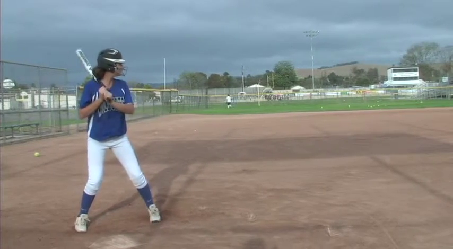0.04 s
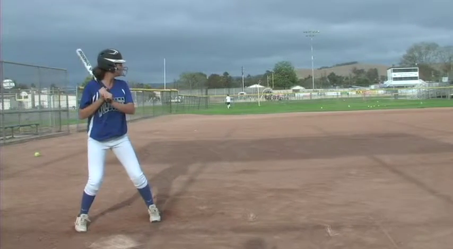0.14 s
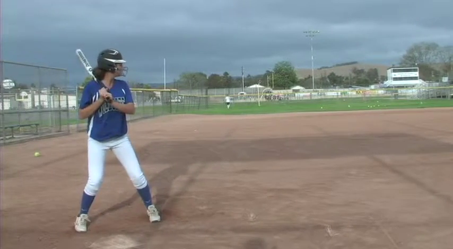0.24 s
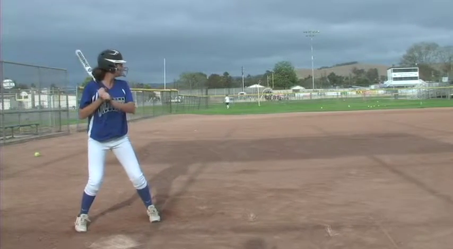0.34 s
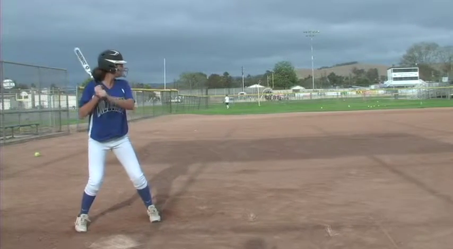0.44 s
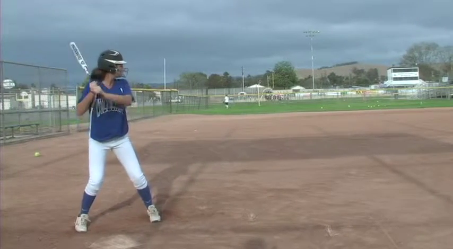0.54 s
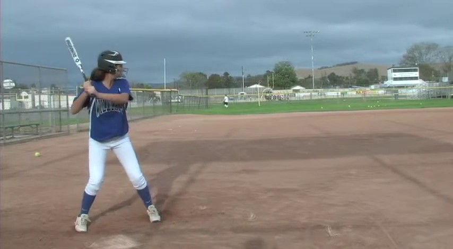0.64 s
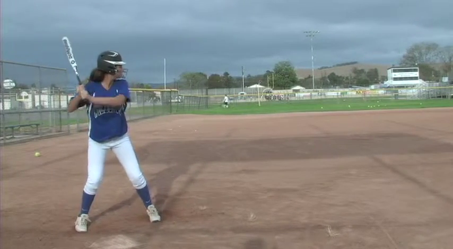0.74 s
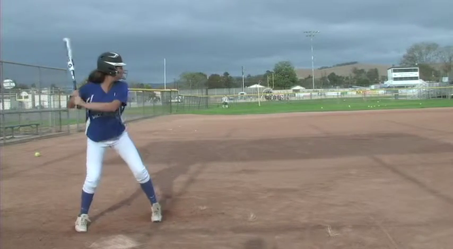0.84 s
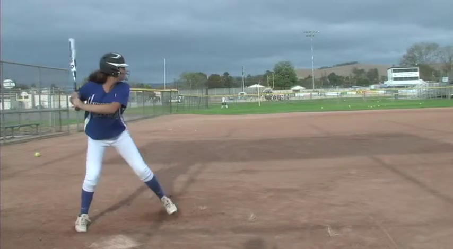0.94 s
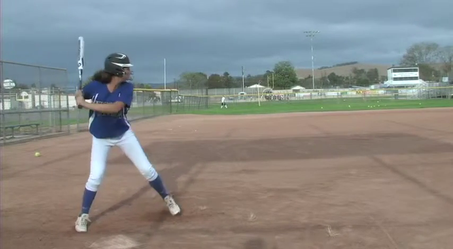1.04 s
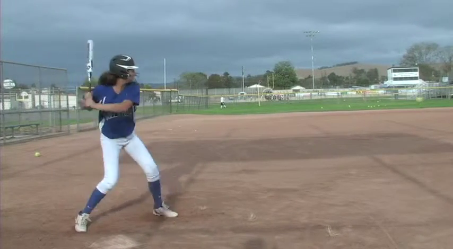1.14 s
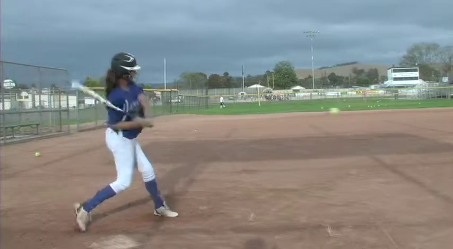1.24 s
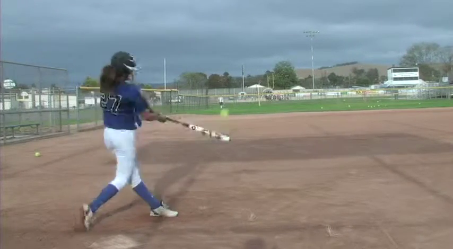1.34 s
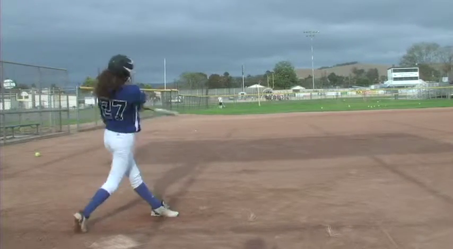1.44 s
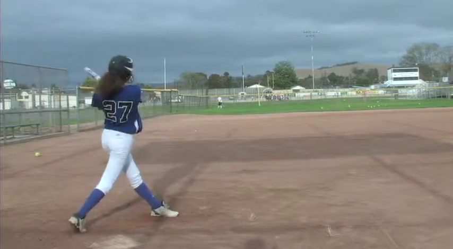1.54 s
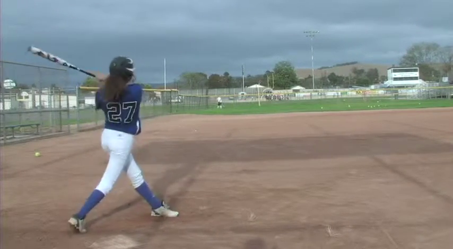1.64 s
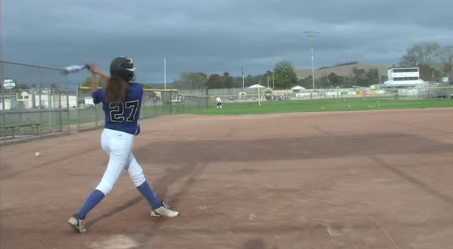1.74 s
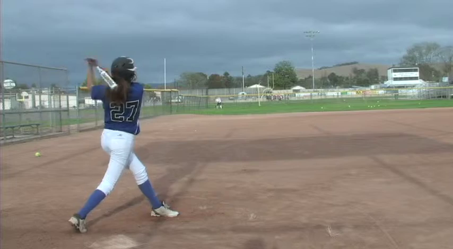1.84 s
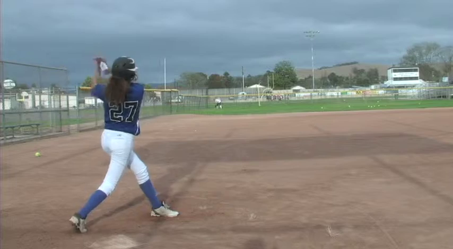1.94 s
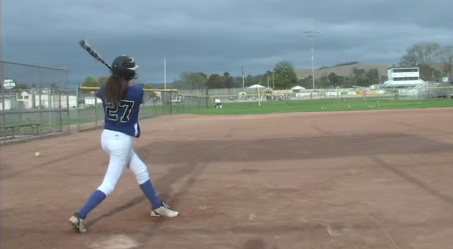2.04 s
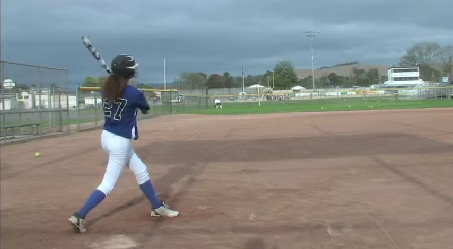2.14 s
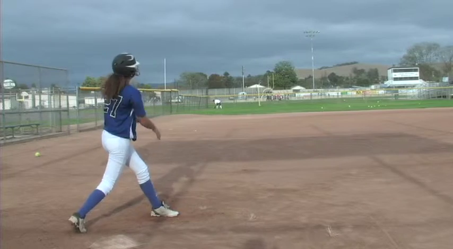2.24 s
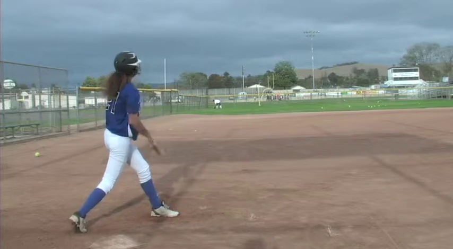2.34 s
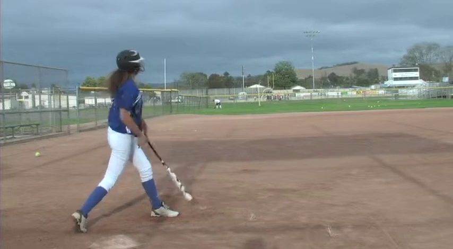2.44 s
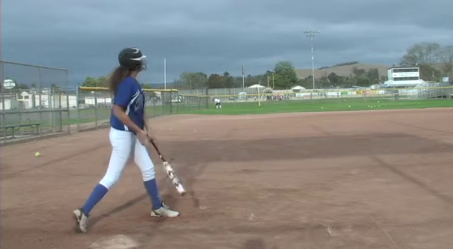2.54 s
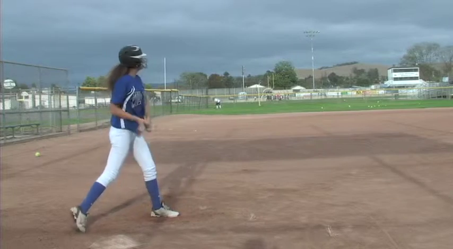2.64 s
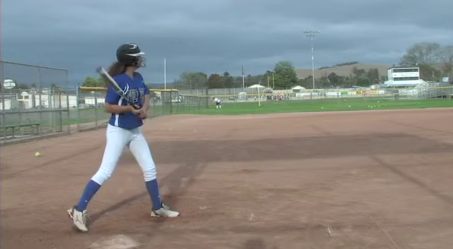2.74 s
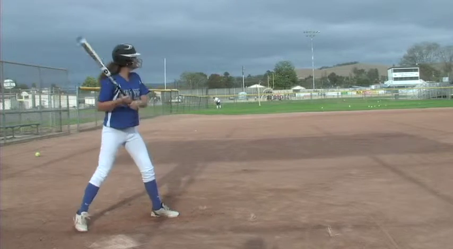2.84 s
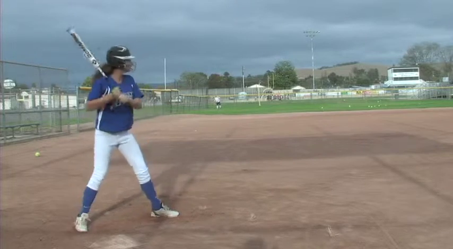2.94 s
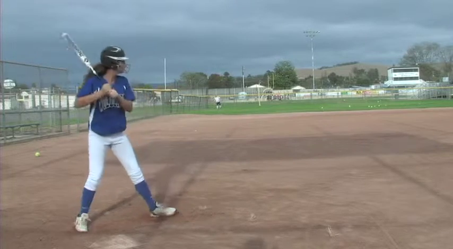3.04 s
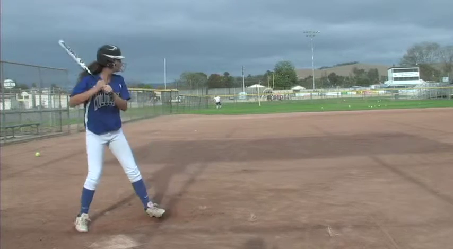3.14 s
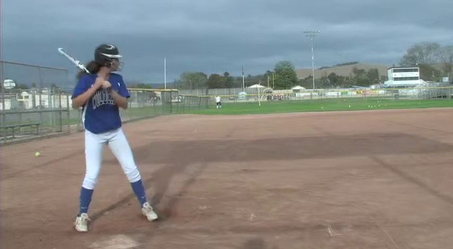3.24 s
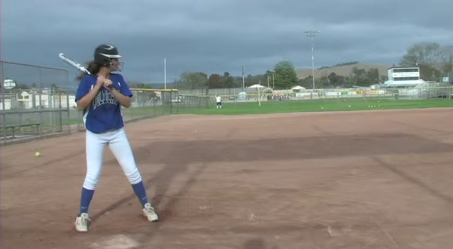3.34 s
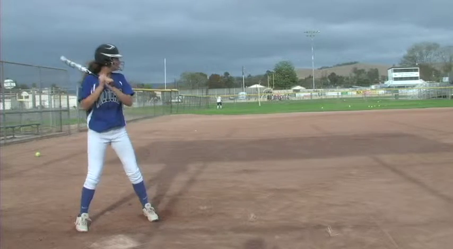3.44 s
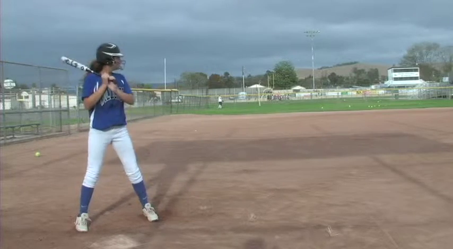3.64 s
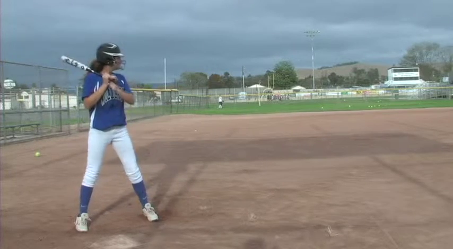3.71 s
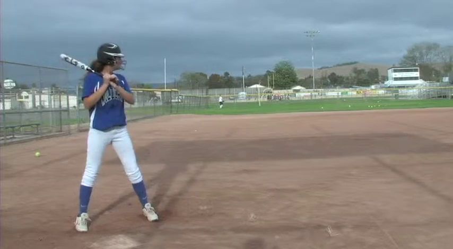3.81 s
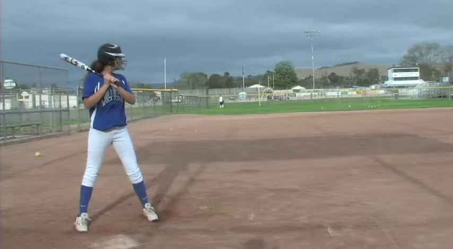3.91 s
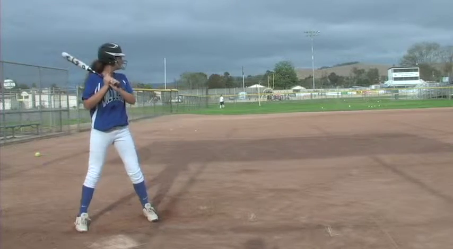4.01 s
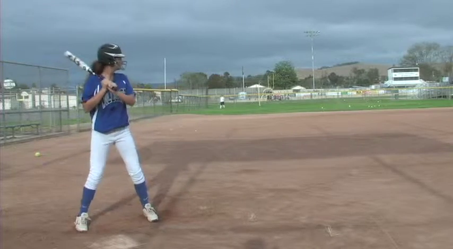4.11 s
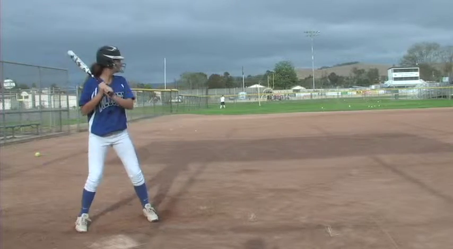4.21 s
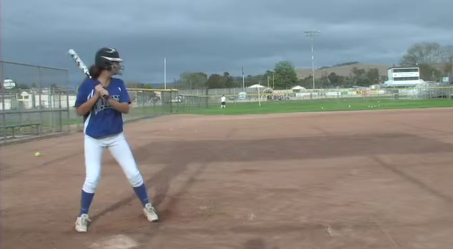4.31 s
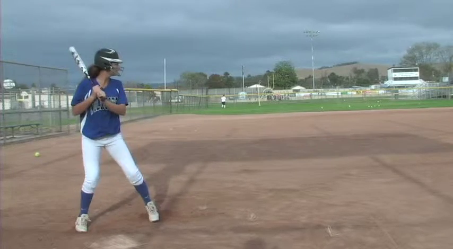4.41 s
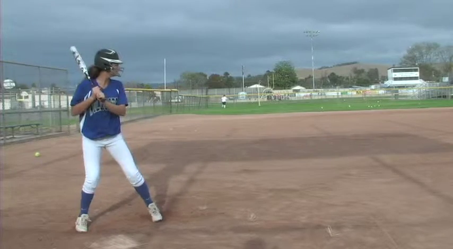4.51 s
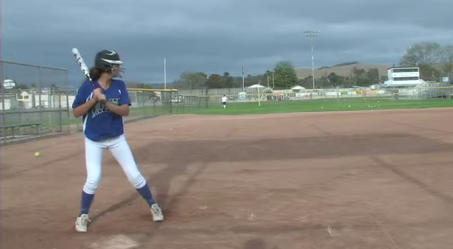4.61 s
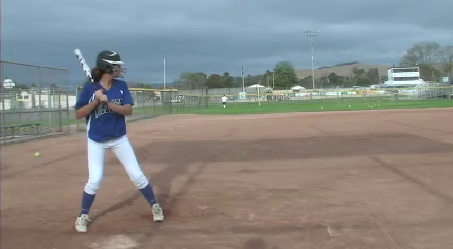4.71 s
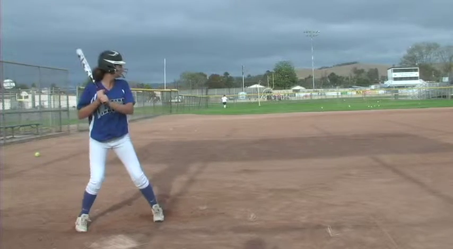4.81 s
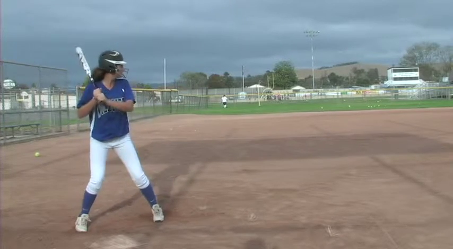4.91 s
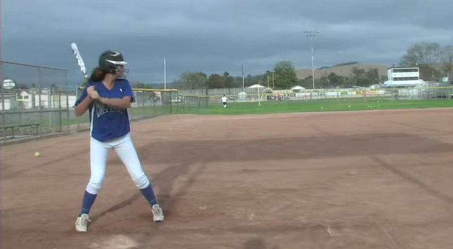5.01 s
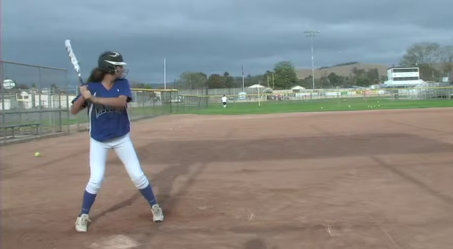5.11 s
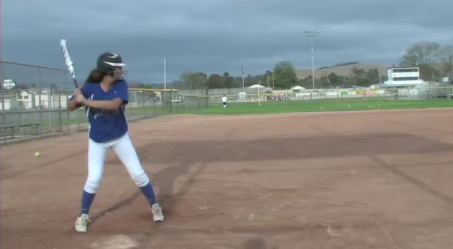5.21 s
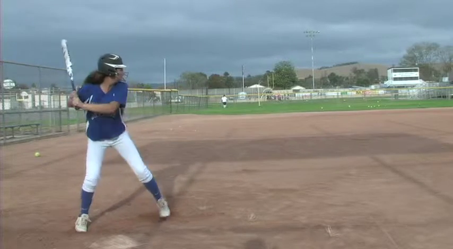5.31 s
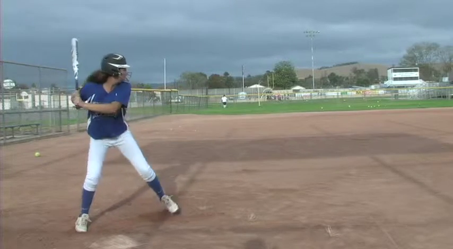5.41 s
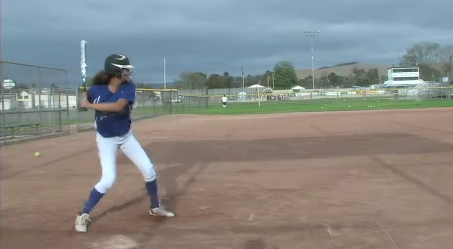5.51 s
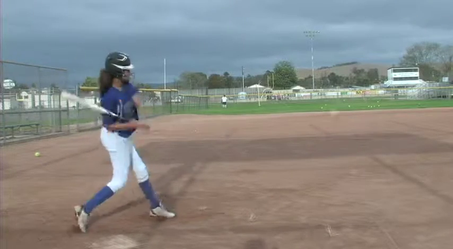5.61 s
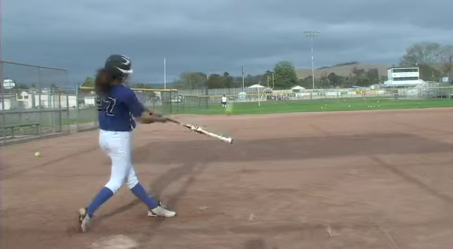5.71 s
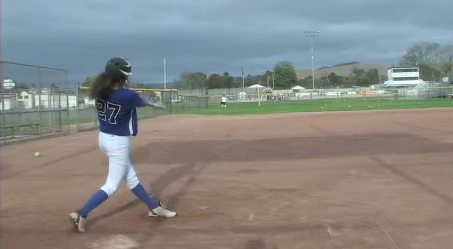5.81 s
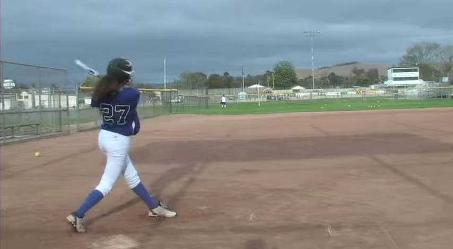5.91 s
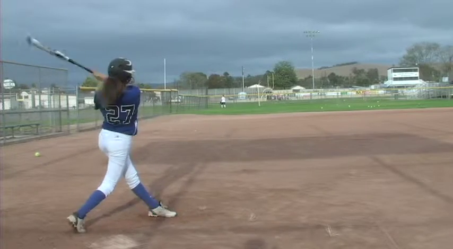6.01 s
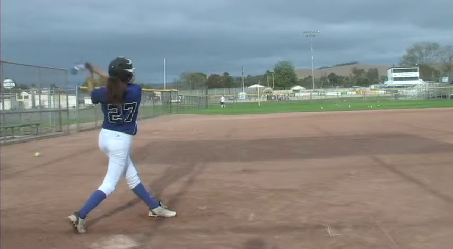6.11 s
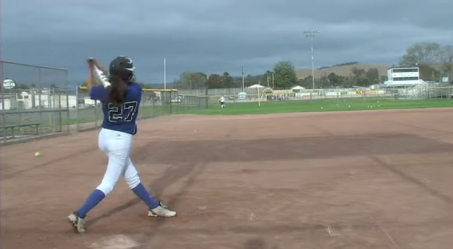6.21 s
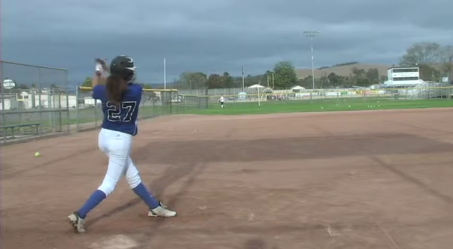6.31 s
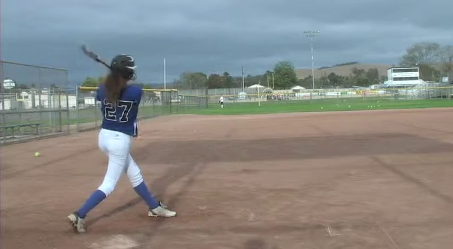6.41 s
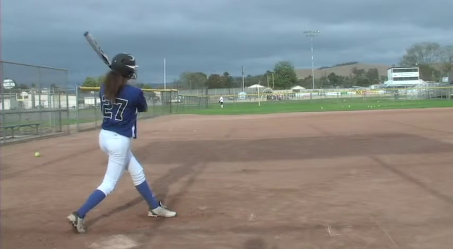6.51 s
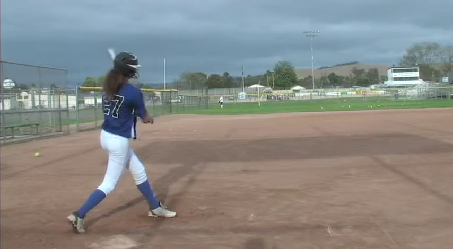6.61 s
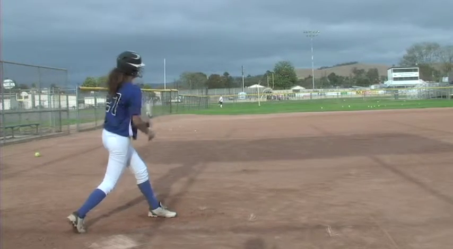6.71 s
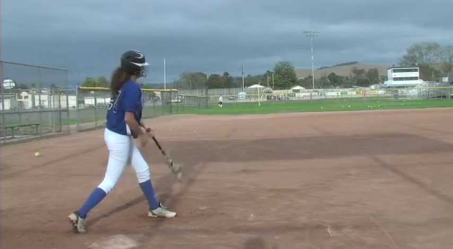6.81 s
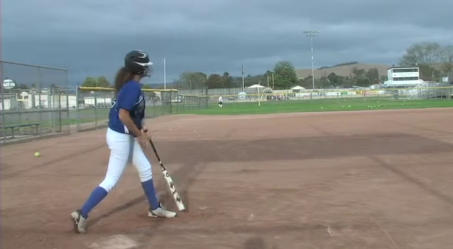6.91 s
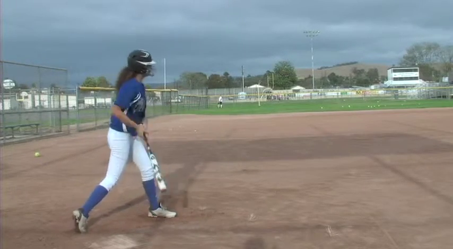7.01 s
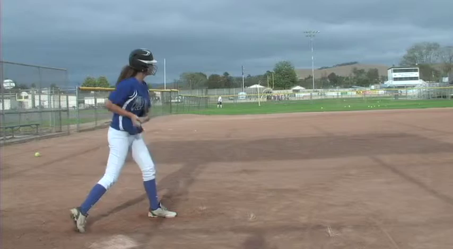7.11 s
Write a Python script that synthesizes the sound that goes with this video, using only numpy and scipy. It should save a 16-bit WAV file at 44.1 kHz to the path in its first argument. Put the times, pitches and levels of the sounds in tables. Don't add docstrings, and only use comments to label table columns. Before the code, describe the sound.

Close outdoor sound of batting practice: a scraping thump as a machine throws the ball, a brief airy swish, then a sharp, hollow, clipped crack with scattered short echoes. It happens twice, about four seconds apart. Between them a fast puttering motor, low traffic roar, hissing foliage and faint far-off knocks continue, with a little low wind flutter at the very end.

```python
import sys
import numpy as np
from scipy import signal
from scipy.fft import rfft, irfft, next_fast_len
from scipy.io import wavfile
from scipy.ndimage import uniform_filter1d, map_coordinates

SR = 44100
rng = np.random.default_rng(int(sys.argv[2]) if len(sys.argv) > 2 else 0)


def log_audio(samples):
    frames = np.atleast_2d(samples).T
    limited = np.clip(frames, -1, 1)
    pcm = np.round(limited * 32767).astype(np.int16)
    wavfile.write(sys.argv[1], SR, pcm)


def volts_from_decibels(level):
    exponent = np.asarray(level, float) / 20
    return 10 ** exponent


N = 315315

# contact in seconds, crack in dB, body in dB.
HITS = [
    (1.3749, 2.5, 9),
    (5.7422, 2.5, 8.5),
]
# time in seconds, level of the leaves in dB.
GUSTS = [(0.0, -52), (0.88, -52.5), (1.04, -50), (1.37, -49.5), (2.41, -52.5), (2.95, -49.5), (3.27, -52.5),
         (3.68, -49), (3.98, -54.5), (5.16, -50.5), (6.21, -51), (6.35, -49.5), (6.91, -51), (7.15, -48.5)]


def unit(x):
    return x / np.sqrt(np.mean(x ** 2) + 1e-20)


def along(points, hz):
    f, v = np.transpose(points)
    return np.interp(np.log(hz + 1), np.log(f + 1), v)


def curves(rows):
    s, *cols = np.transpose(rows)
    return [np.interp(np.arange(N) / SR, s, c) for c in cols]


def wobble(rate):
    coarse = np.arange(0, N + 64, 64)
    knots = rng.standard_normal(int(N * rate / SR) + 4)
    return np.interp(np.arange(N), coarse, map_coordinates(knots, [coarse * rate / SR]))


def swell(s, db, rise_db_per_s, fall_db_per_s):
    late = np.arange(N) / SR - s
    return volts_from_decibels(db + np.where(late < 0, rise_db_per_s, -fall_db_per_s) * late)


def filtered(x, response):
    m = next_fast_len(N + SR // 2)
    return irfft(rfft(x, m) * response(np.fft.rfftfreq(m, 1 / SR)), m)[..., :N]


def noise(spectrum, patchy_db):
    z = signal.stft(rng.standard_normal(N), nperseg=512)[2]
    field = uniform_filter1d(rng.standard_normal(z.shape), size=6, axis=0)
    field = uniform_filter1d(field, size=14, axis=1)
    x = signal.istft(z * volts_from_decibels(patchy_db * unit(field)), nperseg=512)[1][:N]
    return unit(filtered(x, lambda hz: volts_from_decibels(along(spectrum, hz))))


def ring(modes, attack):
    t = np.arange(SR // 2) / SR
    tones = sum(volts_from_decibels(db - 60 * t / t60) * np.sin(2 * np.pi * hz * t) for hz, db, t60 in modes)
    return (1 - np.exp(-t / attack)) ** 2 * tones


def squash(hz, lag, contact):
    t = np.arange(SR // 2) / SR - lag
    onset = np.minimum((t + lag) / .0004, 1)
    return onset * np.sin(2 * np.pi * hz * t) * np.sin(np.pi * np.clip(t / contact, 0, 1)) ** 2


def blows(events, echoes, burst, colour, bodies, wet_db):
    # frequency in Hz, t60 in seconds.
    field_decay = [(150, 0.29), (600, 0.28), (2500, 0.45), (6000, 0.35), (14000, 0.39)]
    clock = np.arange(N) / SR
    envelope = np.zeros((2, N))
    strikes = np.zeros((2, N))
    for s, burst_db, body_db in events:
        for late, echo_burst_db, echo_body_db in echoes:
            arrival = s + late
            near = slice(round((arrival - .02) * SR), round((arrival + .05) * SR))
            bright = np.exp(-late / .05)
            pulse = volts_from_decibels(burst_db + echo_burst_db) * burst(clock[near] - s - late)
            envelope[:, near] += pulse * [[bright], [1 - bright]]
            strikes[int(late > 0), round(arrival * SR)] += volts_from_decibels(body_db + echo_body_db)

    hiss = noise(colour, patchy_db=-1)
    dull = unit(filtered(hiss, lambda hz: 1 / (1 + (4000 / (hz + 1)) ** 2) / (1 + (hz / 6800) ** 4)))
    ringing = signal.fftconvolve(strikes, bodies, axes=1)[:, :N].sum(axis=0)
    close = envelope[0] * hiss + envelope[1] * dull + ringing

    hz, t, z = signal.stft(rng.standard_normal(SR // 2), SR, nperseg=256)
    tail = signal.istft(z * volts_from_decibels(-60 * t / along(field_decay, hz)[:, None]), SR, nperseg=256)[1]
    return close + volts_from_decibels(wet_db) * signal.fftconvolve(close, tail / np.linalg.norm(tail))[:N]


def engine():
    # multiple of the shaft rate, level in dB.
    exhaust = [(1, -15), (2, -1), (3, -1.5), (4, 2), (5, 1), (6, 1), (7, -5), (8, -9), (9, -5), (10, -14),
               (11, -9.5), (12, -5), (13, -3), (14, -7.5)]
    # frequency in Hz, width in Hz, level in dB.
    pipe = [(810, 240, -9.5), (1350, 164, -11), (1606, 127, -13)]
    # frequency in Hz, level in dB, t60 in seconds.
    casing = [(2110, -16, .08), (2340, -12, .05), (2570, -16, .06), (4125, -23, .06), (4540, -23, .06),
              (5070, -16, .035), (5320, -23, .06), (6190, -23, .06), (6360, -17, .06), (7270, -23, .05),
              (8070, -24, .04), (10300, -24, .03), (9200, 0, .008), (11650, -8, .008), (13200, -13, .008)]
    # frequency in Hz, level in dB.
    hum_hz, hum_db = (53, -62.5)
    shaft_hz = 45.83
    turns = np.cumsum(shaft_hz * (1 + .0012 * wobble(3))) / SR + .23

    upper = []
    for k in range(15, 37):
        lift = sum(volts_from_decibels(db) / (1 + (2 * (k * shaft_hz - hz) / width) ** 2) for hz, width, db in pipe)
        upper.append((k, 20 * np.log10(lift)))
    drone = sum(volts_from_decibels(db + 1.47 * wobble(12)) * np.sin(2 * np.pi * (k * turns + rng.random()))
                for k, db in exhaust + upper)

    ticks = np.zeros(N)
    for lag, db in [(0, 21), (.35, -26)]:
        at = np.flatnonzero(np.diff(np.floor(turns - lag)))
        ticks[at] = volts_from_decibels(db + 1.5 * rng.standard_normal(len(at)))
    clatter = unit(signal.fftconvolve(ticks, ring(casing, attack=0.00063))[:N])

    hum_tone = np.sqrt(2) * np.sin(2 * np.pi * hum_hz * np.arange(N) / SR)
    hum = volts_from_decibels(hum_db + 2.7 * wobble(4.46)) * hum_tone
    return volts_from_decibels(-41.5) * unit(drone) + volts_from_decibels(-5.5 + curves(GUSTS)[0]) * clatter + hum, turns


def traffic():
    # frequency in Hz, level in dB per Hz.
    roar = [(15, -47), (25, -30), (80, -1.5), (174, -4.5), (276, -3.5), (461, -6.5), (587, -3), (1010, -11),
            (1320, -11), (3210, -28), (6140, -31), (9200, -30), (15800, -44)]
    return volts_from_decibels(-43) * noise(roar, patchy_db=0.33)


def leaves(turns):
    # frequency in Hz, level in dB per Hz.
    rustle = [(1060, -24), (1800, -2), (2210, -8.5), (2550, 2.5), (2730, -3.5), (3240, -4), (5540, -1),
              (6190, -0.5), (8560, -6), (9320, -9.5), (11000, -15.5), (13800, -23)]
    gust_db = curves(GUSTS)[0] + 1
    bright_db = 0.7 * (gust_db - gust_db.mean())
    ripple = rng.standard_normal(SR // 140)
    hiss = filtered(noise(rustle, patchy_db=.7), lambda hz: volts_from_decibels(2.2 * map_coordinates(ripple, [hz / 70])))
    tilt = filtered(hiss, lambda hz: np.log2((hz + 1) / 6000))
    hiss = hiss + bright_db * np.log(10) / 20 * tilt
    hiss = hiss * (1 + 0.14 * np.cos(2 * np.pi * turns))
    return volts_from_decibels(gust_db + 0.47 * wobble(12)) * hiss


def puffs():
    # middle in seconds, level in dB, half length in seconds.
    shakes = [
        (.55, -62, .15),
        (2.9, -61, .25),
        (3.66, -56, .16),
        (6.35, -59, .15),
    ]
    # frequency in Hz, level in dB per Hz.
    dry_leaves = [(4000, -30), (7000, -2), (9500, 0), (13500, -6), (14500, -25)]
    clock = np.arange(N) / SR
    gain = sum(volts_from_decibels(db - 6 * ((clock - s) / half) ** 2) for s, db, half in shakes)
    return gain * noise(dry_leaves, patchy_db=1.5)


def machine():
    # release in seconds, scrape in dB, thump in dB.
    throws = [
        (0.8657, -10, -12),
        (5.2321, -12, -12),
    ]
    # delay in seconds, scrape in dB, thump in dB.
    throw_echoes = [(0, 0, 0), (.011, -44, -38), (0.025, -22, -3.5), (0.0327, -11, -24), (.041, -23, -33),
                    (.064, -29, -13.5), (.091, -33, -23)]
    # frequency in Hz, level in dB, t60 in seconds.
    frame_modes = [(135, -11, 0.065), (357, -15, 0.12), (458, -11, .08), (577, -13, 0.11), (698, -9, 0.085),
                   (848, -14, 0.09), (180.3, -11.5, 0.48), (213.2, -10, 0.47)]
    # frequency in Hz, level in dB per Hz.
    scrape_colour = [(590, -53), (1000, -15), (2550, -6), (4230, -3), (5920, 3.5), (7120, -1.5), (8360, 4),
                     (11400, -4.5), (15800, -23)]
    grip = .008

    def scrape(t):
        gripped = (t > -.0108) * (volts_from_decibels(-6 * (t / 0.0036) ** 2) + volts_from_decibels(-23.5))
        released = volts_from_decibels(-60 * t / 0.0037) + volts_from_decibels(-23 - 60 * t / 0.067)
        return np.where(t < 0, gripped, released)

    tyre = squash(hz=178, lag=.0007, contact=.028)
    tyre = tyre + volts_from_decibels(-2) * squash(hz=340, lag=-.003, contact=.021)
    thump = tyre + np.roll(ring(frame_modes, attack=0.003), round(.002 * SR))
    bounce = squash(hz=194, lag=0.0002, contact=0.024)
    early = [(s - grip, scrape_db, thump_db) for s, scrape_db, thump_db in throws]
    return blows(early, throw_echoes, lambda t: scrape(t - grip), scrape_colour,
                 np.array([thump, bounce]), wet_db=-20)


def swings():
    swing_db = [-40, -43]
    gain = sum(swell(hit[0], db, rise_db_per_s=54, fall_db_per_s=130) for hit, db in zip(HITS, swing_db))
    return gain * noise([(300, -21), (900, 4), (1600, 0.5), (2600, -6), (6000, -9), (9000, -60)], patchy_db=0.0)


def clacks():
    # start in seconds, peak in dB, frequency in Hz, t60 in seconds.
    knocks = [(1.29, -33, 2700, .008), (1.339, -35, 5700, .008), (2.139, -34, 4000, .005),
              (2.1395, -35, 2800, .005), (2.159, -33, 1700, .008), (2.1595, -36, 2300, .006),
              (4.63, -42, 2500, .004), (4.69, -40, 1500, .006), (2.6505, -30, 1600, .009),
              (2.6507, -31, 2200, .008), (2.6509, -35, 3300, .004), (2.68, -52, 2115, .3),
              (4.095, -47, 2115, .3), (4.14, -49, 2108, .3), (5.055, -49, 2115, .3)]
    out = np.zeros(N + SR)
    for s, db, hz, t60 in knocks:
        out[round(s * SR):][:SR // 2] += ring([(hz, db, t60)], attack=0.000067)
    return out[:N]


def bat_echoes():
    # delay in seconds, crack in dB.
    chatter = [(.0017, -2), (.0031, -5), (.0048, -14), (.0065, -20), (.0128, -27), (.0243, -24)]
    # delay in seconds, crack in dB, body in dB.
    near_walls = [(0.0214, -16, -23.5), (.03, -13, -13.5), (.0382, -30, -25.5)]
    sheds = [.0533, .0642, .0673, .0762, .0856, .0968, .1013, .1215, .1366, .2296]
    posts = [.044, .049, .071, .089, .094, .1139, .1258, .1528, .1718, .2113]
    far = []
    for delays, db_at_60_ms in [(sheds, -29), (posts, -36)]:
        far += [(s, db_at_60_ms - 19 * np.log10(s / .06)) for s in delays]
    direct = [(0, 0, 0)]
    rattle = [(s, db, -np.inf) for s, db in chatter]
    return direct + rattle + near_walls + [(s, db, db - 9) for s, db in far]


def bat():
    # frequency in Hz, level in dB, t60 in seconds.
    barrel = [(226, -6.5, 0.016), (545, -4, 0.02), (715, -5.5, .025), (860, -10.5, 0.017),
              (1250, -24, 0.035), (1418, -19, 0.02), (1887, -11, 0.017), (3094, -13, 0.011),
              (3750, -22, 0.035)]
    # frequency in Hz, level in dB per Hz.
    crack_colour = [(590, -28), (1000, -5), (1780, 4), (2050, -2.5), (3250, 2), (3860, -7), (5210, 1.5),
                    (8560, -1.5), (15800, -22)]

    def crack(t):
        return (t > 0) * (volts_from_decibels(-6 * (t / .0012) ** 2) + volts_from_decibels(-30 - 60 * np.abs(t) / .05))

    knock = squash(hz=455, lag=-.0007, contact=.0072)
    push = squash(hz=265, lag=-.0001, contact=.0068)
    push = push + volts_from_decibels(-1) * squash(hz=560, lag=.0003, contact=.0055)
    rebound = -volts_from_decibels(-16) * np.roll(knock, round(.0121 * SR))
    direct = push + rebound + ring(barrel, attack=0.00051)
    reflected = knock + volts_from_decibels(-2) * ring(barrel, attack=0.00091)
    return blows(HITS, bat_echoes(), crack, crack_colour, np.array([direct, reflected]), wet_db=-24)


def buffet():
    gain = volts_from_decibels(-65) + swell(7.15, -42, rise_db_per_s=95, fall_db_per_s=0)
    flutter = noise([(18, -48), (45, 9), (90, -10), (300, -50)], patchy_db=1.0)
    return gain * volts_from_decibels(2.2 * wobble(12)) * flutter


def scene():
    motor, turns = engine()
    background = motor + traffic() + leaves(turns) + puffs()
    practice = machine() + swings() + bat()
    return (background + practice + clacks() + buffet())[None]


def top_cut(x):
    return signal.sosfilt(signal.butter(12, 15930, fs=SR, output="sos"), x)


def record(dry):
    clipped = np.clip(dry, -1, 1)
    return top_cut(clipped)


dry = scene()
out = record(dry)
log_audio(out)
```